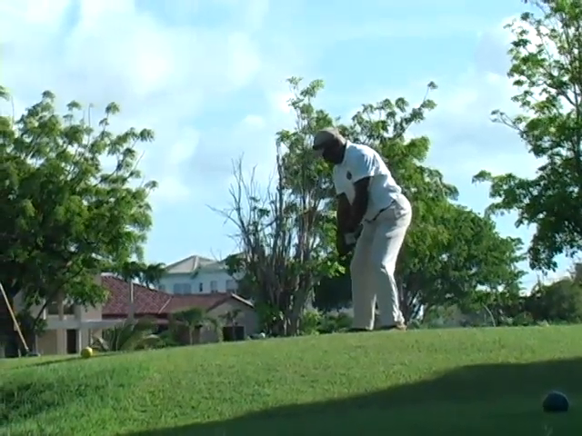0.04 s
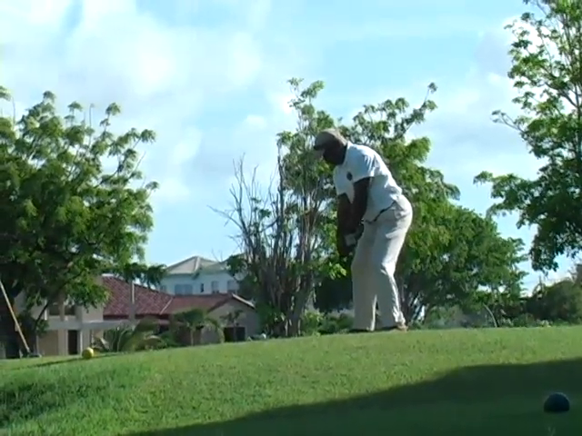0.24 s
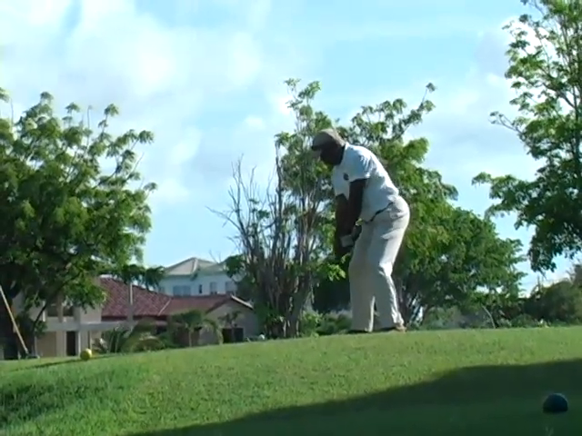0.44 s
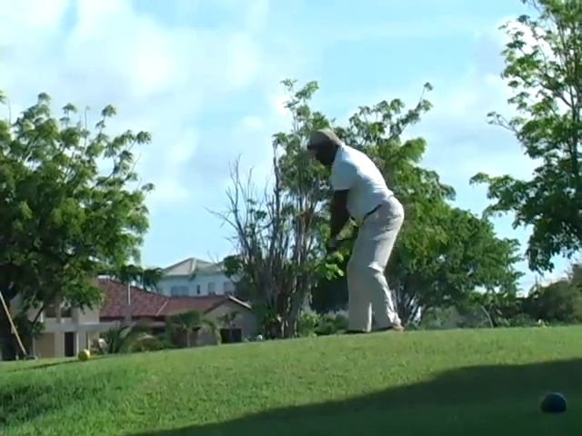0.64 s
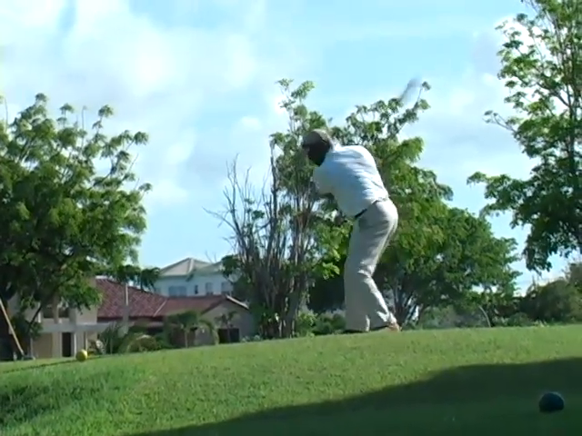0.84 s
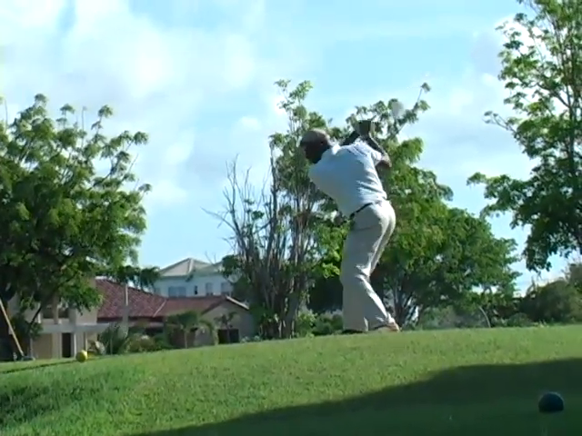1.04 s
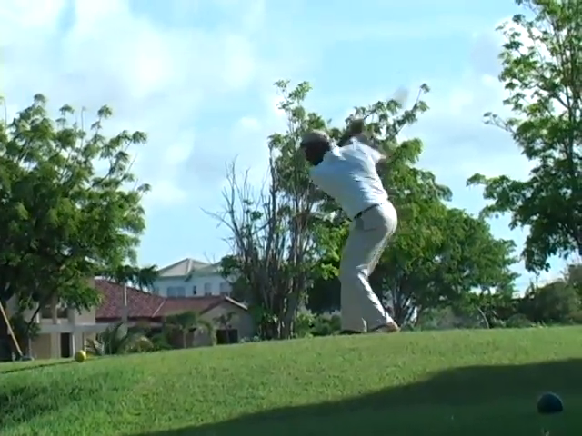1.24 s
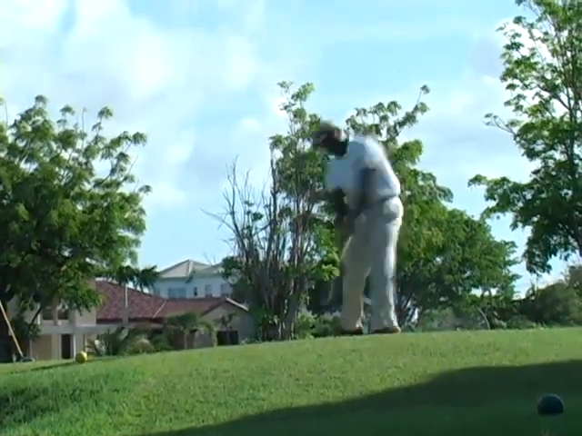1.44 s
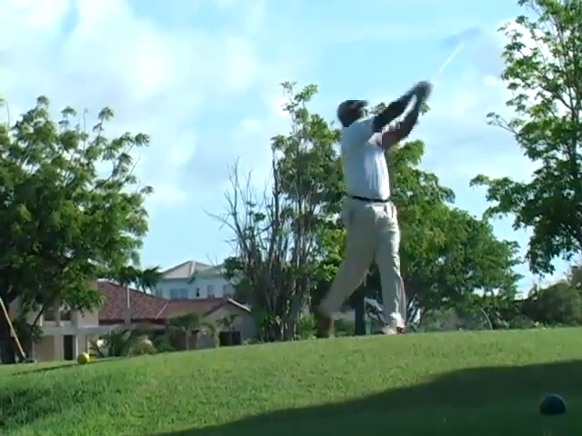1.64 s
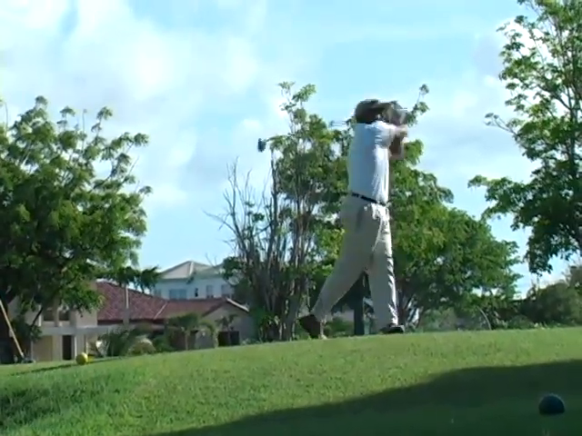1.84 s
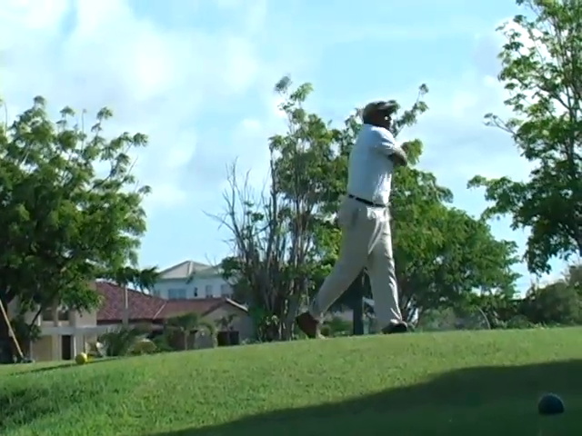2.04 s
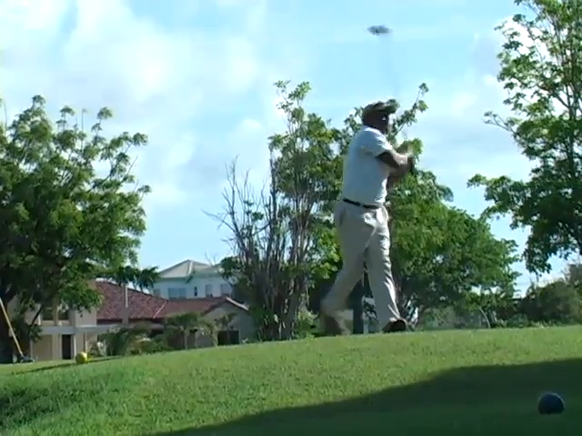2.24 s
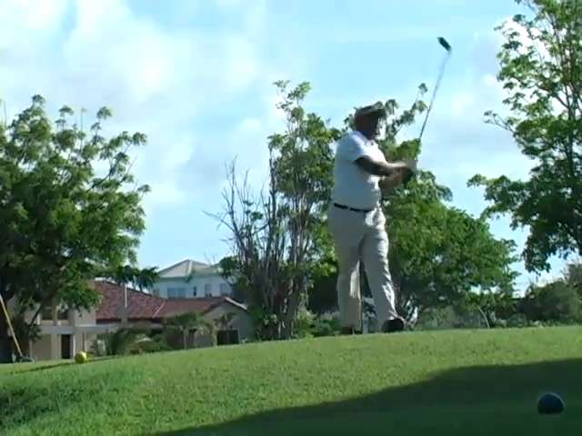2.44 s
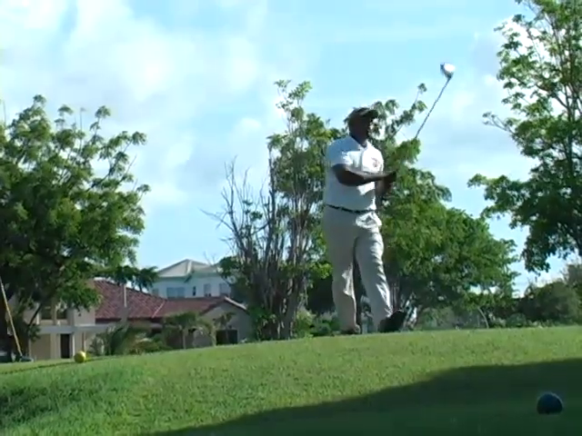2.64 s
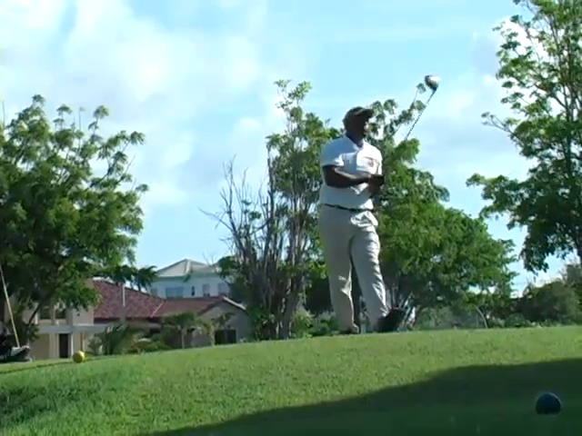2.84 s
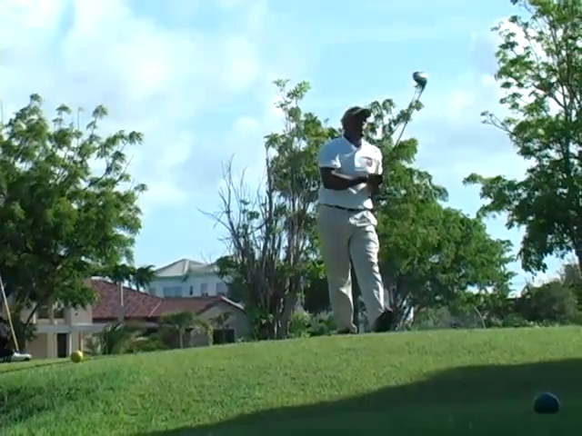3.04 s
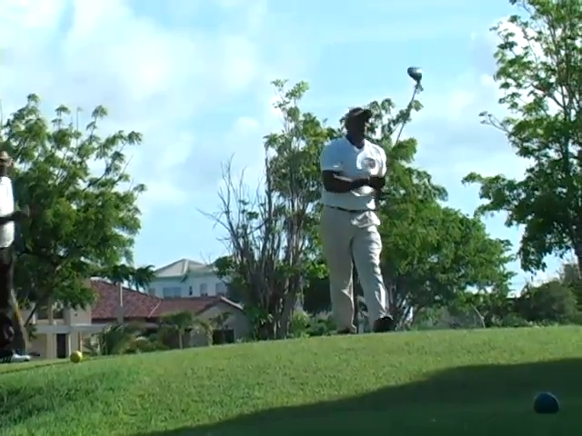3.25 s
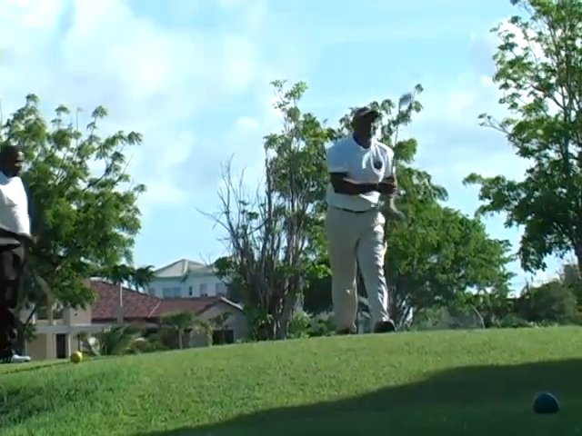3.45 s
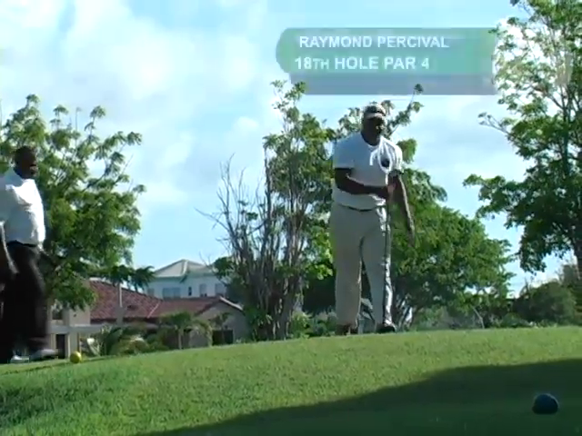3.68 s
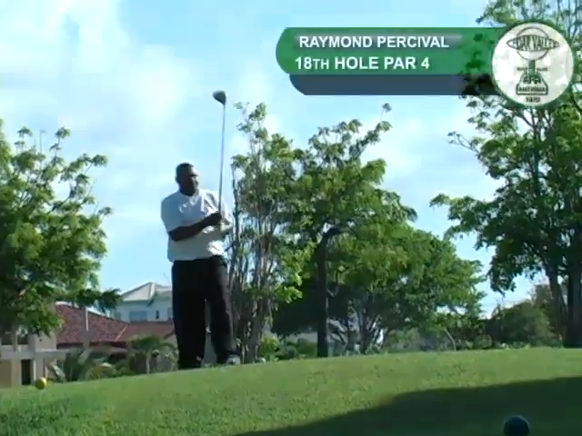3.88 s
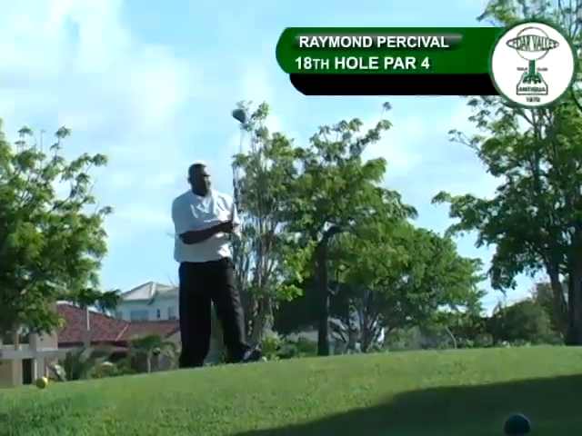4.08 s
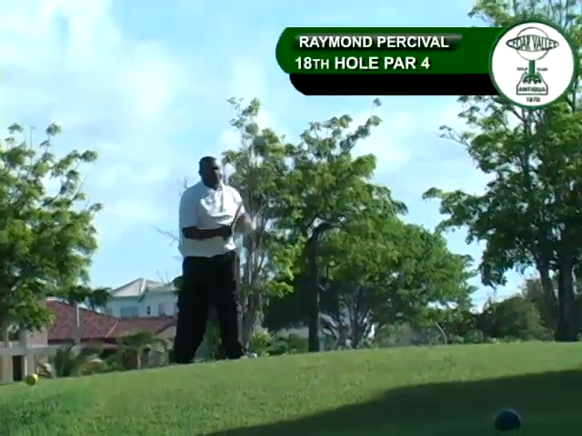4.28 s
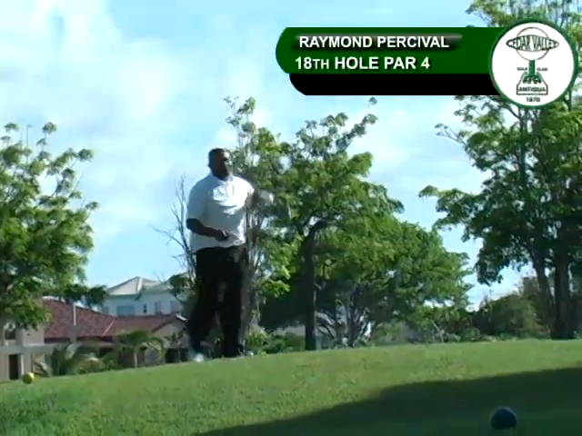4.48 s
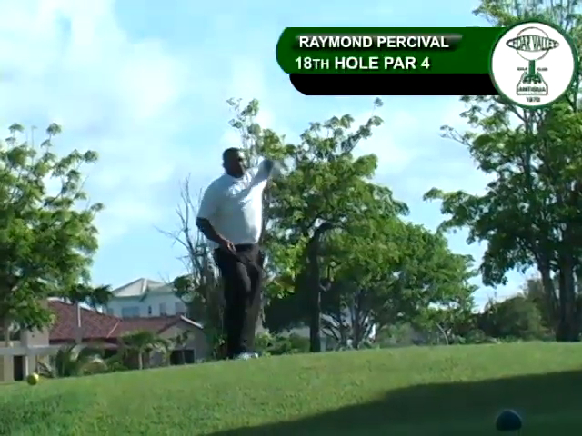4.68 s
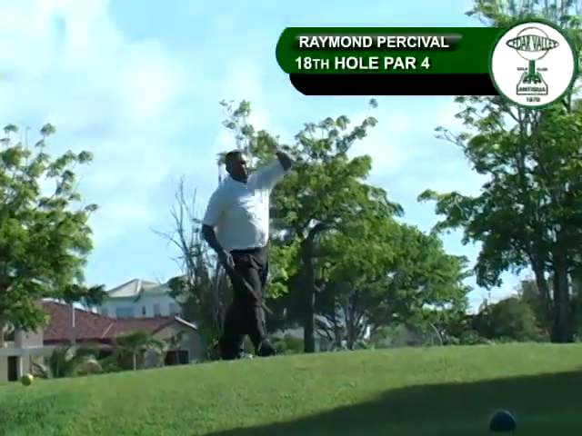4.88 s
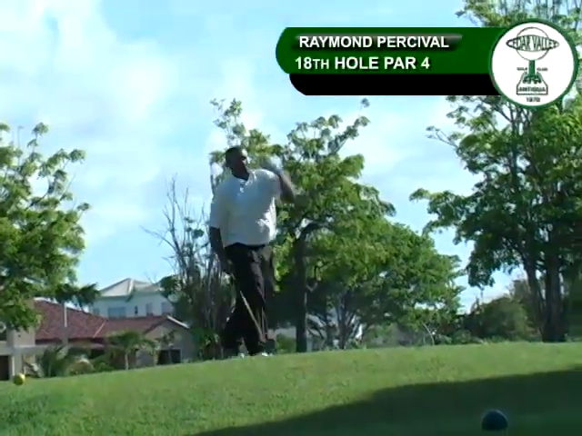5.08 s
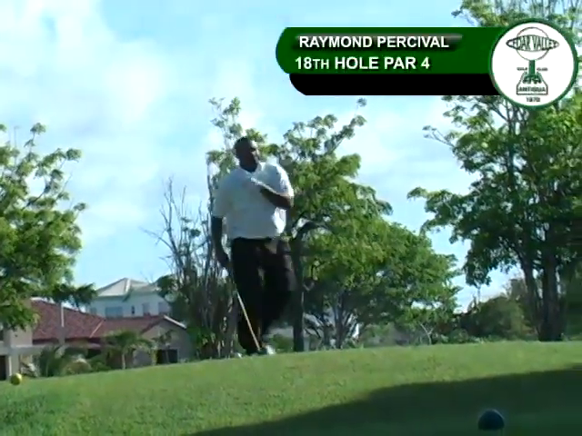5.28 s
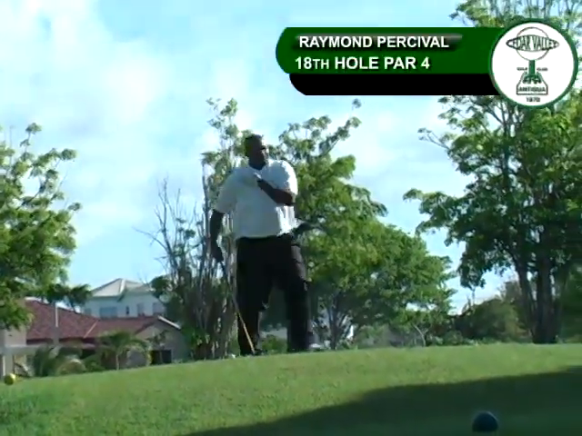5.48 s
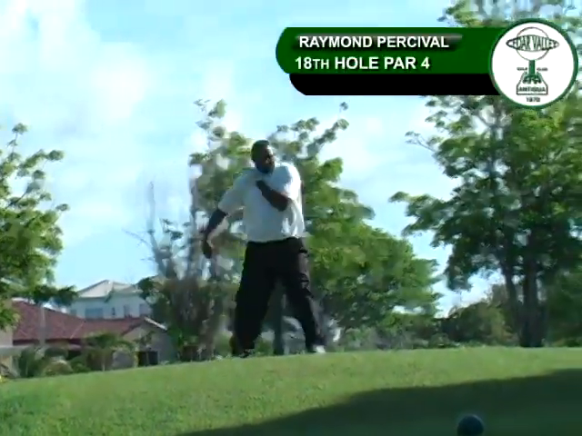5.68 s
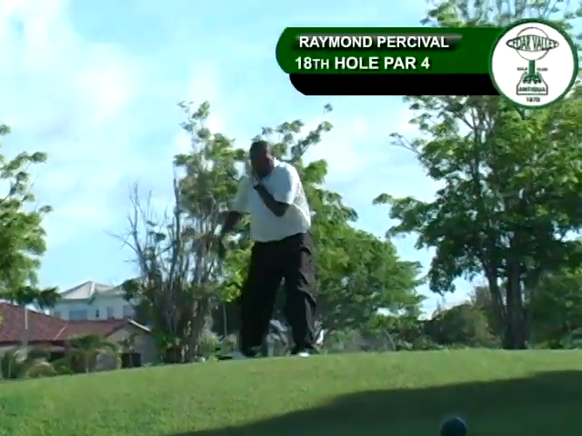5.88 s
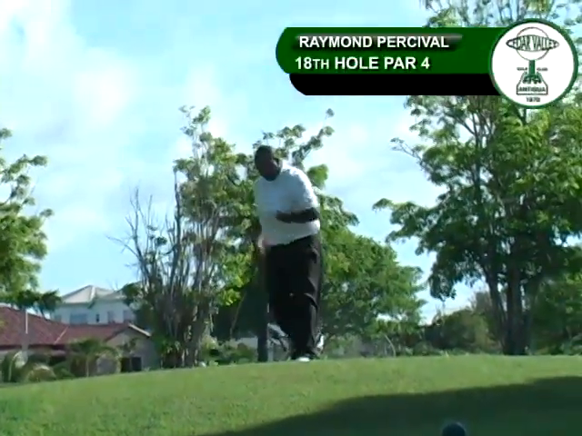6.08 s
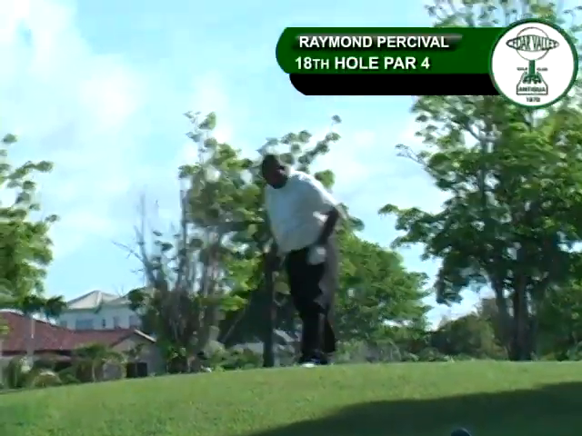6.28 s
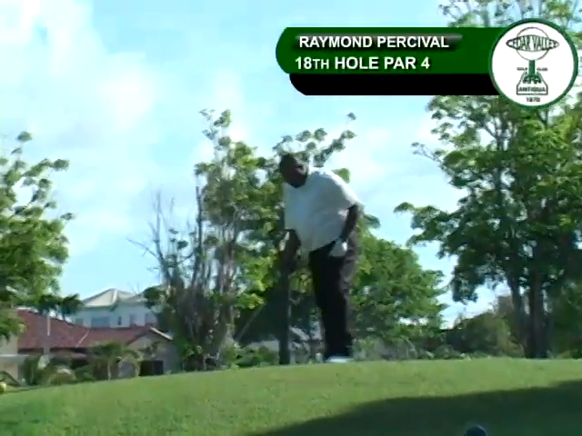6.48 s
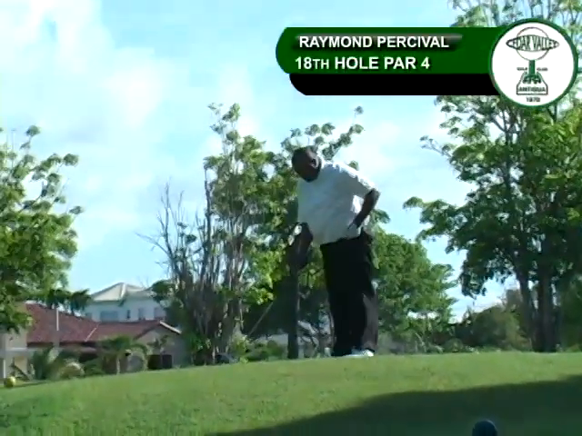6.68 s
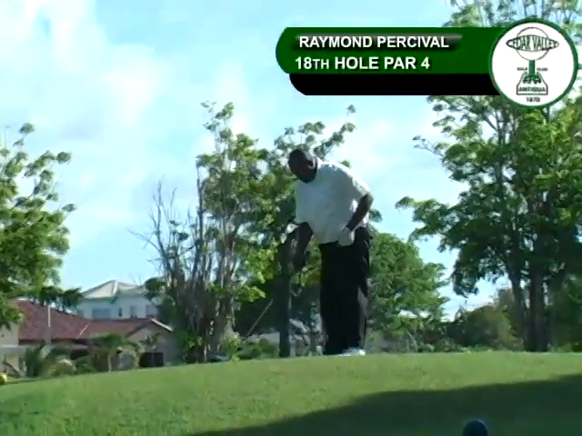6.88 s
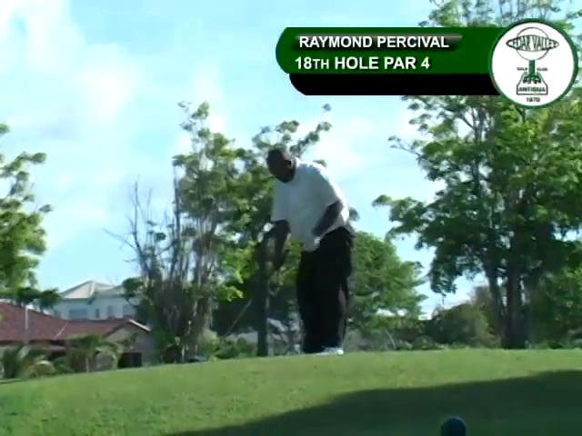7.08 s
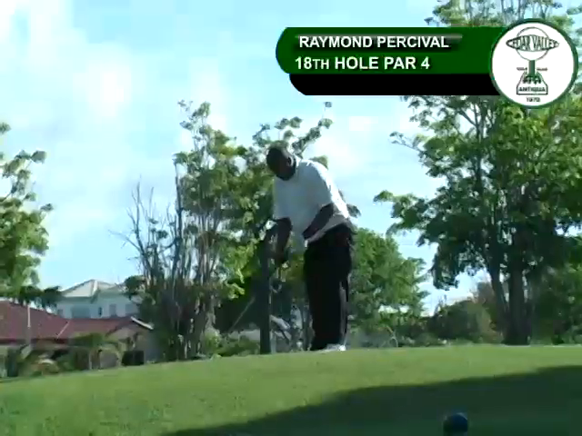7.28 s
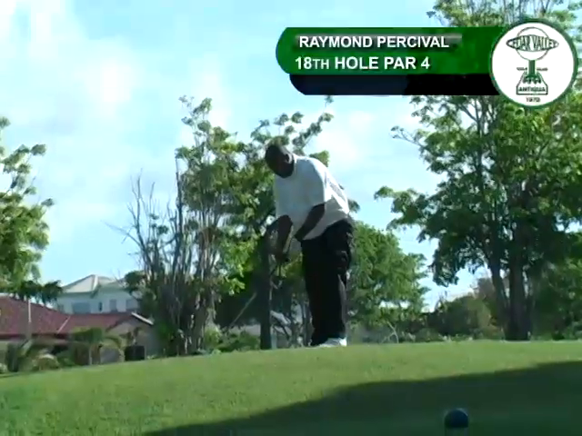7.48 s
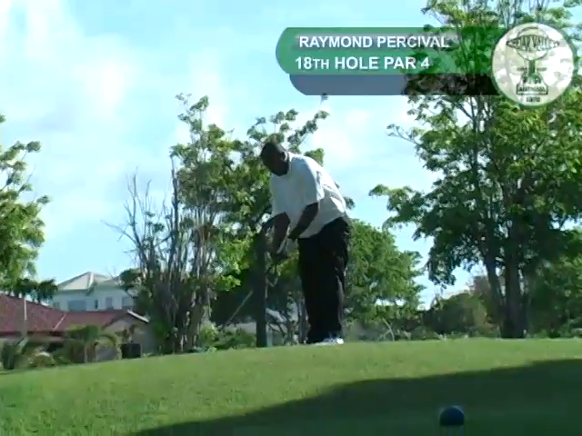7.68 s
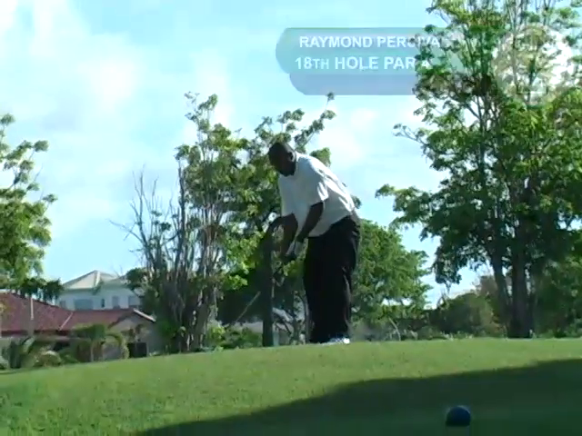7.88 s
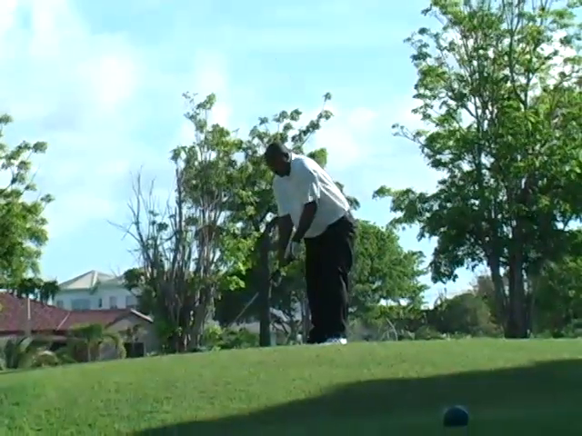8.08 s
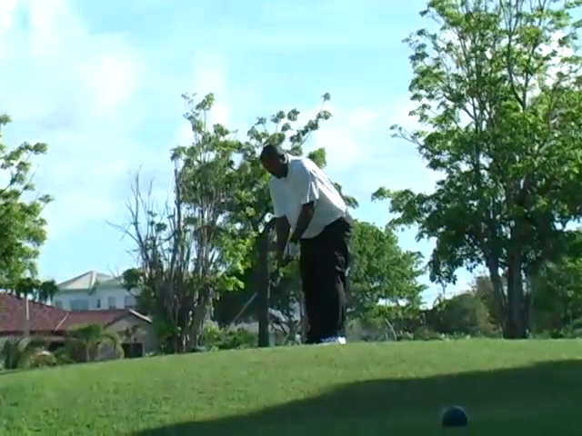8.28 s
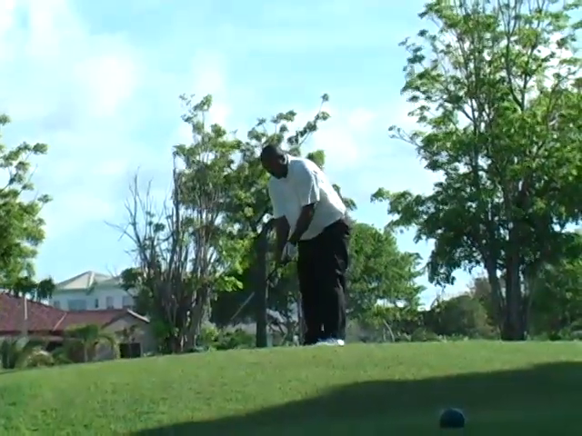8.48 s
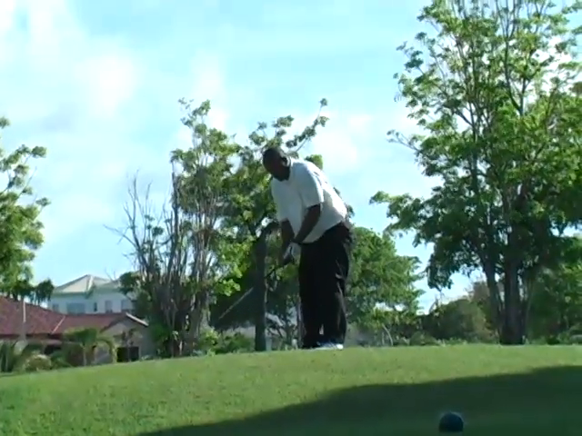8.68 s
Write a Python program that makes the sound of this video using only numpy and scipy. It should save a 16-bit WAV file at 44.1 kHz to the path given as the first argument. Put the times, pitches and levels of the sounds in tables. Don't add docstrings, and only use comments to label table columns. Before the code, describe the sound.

Outdoor golf tee with faint birds, one overloaded metal driver crack with ringing scatter, distant dog barks, buffeting wind, then bright songbird phrases.

```python
import sys
import numpy as np
from scipy import signal
from scipy.fft import rfft, irfft
from scipy.io import wavfile

SR = 44100
rng = np.random.default_rng(int(sys.argv[2]) if len(sys.argv) > 2 else 0)


def unload_audio(sound):
    columns = np.transpose(np.atleast_2d(sound))
    steps = np.round(np.clip(columns, -1, 1) * 32767)
    wavfile.write(sys.argv[1], SR, steps.astype(np.int16))


def gain_from_decibels(decibels):
    exponent = np.asarray(decibels, float) / 20
    return 10 ** exponent


N = 384993
ONE_INPUT_DB = 6.5


def rms_one(x):
    return x / np.sqrt(np.mean(x ** 2) + 1e-20)


def span(start_s, end_s):
    where = slice(round(start_s * SR), min(round(end_s * SR), N))
    return where, np.arange(N)[where] / SR


def columns(rows):
    s, *values = np.transpose(rows)
    where, t = span(s[0], s[-1])
    return where, [np.interp(t, s, v) for v in values]


def coloured(points, size):
    hz, db = np.transpose(points)
    axis_hz = np.maximum(np.fft.rfftfreq(size, 1 / SR), 1)
    gain = gain_from_decibels(np.interp(np.log(axis_hz), np.log(hz), db))
    return rms_one(irfft(rfft(rng.standard_normal(size)) * gain, size))


def sine(hz):
    return 2 * np.pi * np.cumsum(hz) / SR


def hum(hz, width_hz, size):
    lowpass = signal.butter(3, width_hz / 2, fs=SR, output="sos")
    slow = signal.sosfilt(lowpass, rng.standard_normal((2, size + 600)))[:, 600:]
    phase = sine(hz * np.ones(size))
    return rms_one(slow[0] * np.sin(phase) + slow[1] * np.cos(phase))


def drift(rate_hz, size):
    knots = rng.standard_normal(int(size / SR * 400) + 2)
    r = np.exp(-2 * np.pi * rate_hz / 400)
    smooth = rms_one(signal.lfilter([1], [1, -r], knots))
    return np.interp(np.linspace(0, len(knots) - 1, size), np.arange(len(knots)), smooth)


def add(out, start_s, x):
    i = round(start_s * SR)
    out[i:i + len(x)] += x[:N - i]


def struck(modes, spread_db=0):
    t = np.arange(SR // 10) / SR
    return sum(gain_from_decibels(db + spread_db * rng.normal() - 60 * t / t60_s) * np.sin(2 * np.pi * hz * t)
               for hz, db, t60_s in modes)


def foliage(x, wet_db, t60_s):
    t = np.arange(SR // 2) / SR
    near = gain_from_decibels(-60 * t / t60_s + 3.0 * drift(60, len(t)))
    far = gain_from_decibels(-13.5 - 60 * t / (10.0 * t60_s))
    tail = rng.standard_normal(len(t)) * (near + far) * np.clip(t / 0.0018, 0, 1)
    return x + gain_from_decibels(wet_db) * signal.fftconvolve(x, tail / np.sqrt(np.sum(tail ** 2)))[:N]


def strike():
    return impact() + head_turning() + scatter() + wall_echoes()


# hz, peak_db, t60_s
FACE_MODES = [(1070, -3, 0.0048), (1830, -13, 0.0088), (5370, -1.5, 0.018), (6710, -0.5, 0.021),
              (9400, -10, 0.018), (10330, -9, 0.018), (11400, -9, .015), (4700, -12, 0.024)]


def impact():
    strike_s, ground_echo_s, ground_echo_db = 1.5338, .0045, -11
    out, crack = np.zeros(N), struck(FACE_MODES)
    t = np.arange(len(crack)) / SR
    push = np.sin(2 * np.pi * t / 0.00061) * (t < .00052)
    spray = gain_from_decibels(-5.0 - 60 * t / 0.023) * hum(7000, 8000, len(t)) * (t > .0004)
    ground = spray + struck([(4550, 9.5, 0.0143), (10300, -9, 0.017)])
    add(out, strike_s, crack + gain_from_decibels(2.0) * push + spray)
    add(out, strike_s + ground_echo_s, gain_from_decibels(ground_echo_db) * ground)
    return out


# time_s, pitch_hz, level_db
CROWN_GLIDE = [
    (1.547, 4390, -34),
    (1.554, 4330, -25),
    (1.572, 4150, -18),
    (1.585, 4040, -25),
    (1.6, 4000, -51),
]


def head_turning():
    out = np.zeros(N)
    where, (hz, db) = columns(CROWN_GLIDE)
    out[where] = gain_from_decibels(db + 3.0 + 1.3 * drift(90, len(hz))) * np.sin(sine(hz))
    return out


# arrival_s, level_db, hold_s, t60_s
NEAR_ARRIVALS = [
    (1.536, -25.5, .04, .3),
]
FAR_ARRIVALS = [
    (1.63, -36, 0.014, 0.32),
    (1.682, -38.5, 0.0093, 0.15),
    (1.718, -39, 0.0031, .55),
]
# freq_hz, level_db (per Hz)
NEAR_SPECTRUM = [(180, -64), (300, -37), (610, -23), (808, -32), (1180, -24), (1970, -25), (3510, -22),
                 (4140, -7), (4420, -12), (4960, -14.5), (6570, -7.5), (7620, -15), (9140, -9),
                 (15500, -29)]
FAR_SPECTRUM = [(410, -34), (700, -10), (1030, -17), (3060, -14), (3710, -7), (4380, -8), (5240, -12),
                (5660, -1), (6270, -8), (10500, -14.5), (15000, -33)]
# from_hz, to_hz, width_hz, level_db
NEAR_HEAD_RING = [
    (6380, 7000, 330, -3),
    (6900, 7700, 260, -8),
    (9150, 9200, 440, -14.5),
    (5500, 3400, 330, -24),
]
FAR_HEAD_RING = [
    (3640, 4100, 120, -7),
    (5780, 7000, 330, -10),
    (6800, 7200, 430, -12),
]


def scatter():
    out = np.zeros(N)
    near = NEAR_ARRIVALS, NEAR_SPECTRUM, NEAR_HEAD_RING
    far = FAR_ARRIVALS, FAR_SPECTRUM, FAR_HEAD_RING
    for arrivals, spectrum, ring in (near, far):
        where, gain = returns(arrivals)
        size = len(gain)
        ringing = np.zeros(size)
        for from_hz, to_hz, width_hz, ring_db in ring:
            band = hum(np.linspace(from_hz, to_hz, size), width_hz, size)
            ringing += gain_from_decibels(ring_db + 2.9 * drift(45, size)) * band
        level = gain * gain_from_decibels(ONE_INPUT_DB + 1.4 * drift(110, size))
        out[where] += level * rms_one(coloured(spectrum, size) + ringing)
    return out


def returns(rows):
    rise_s = 0.0087
    where, t = span(rows[0][0], rows[-1][0] + rows[-1][2] + 0.48 * rows[-1][3])
    power = np.zeros(len(t))
    for s, db, hold_s, t60_s in rows:
        rise = np.clip((t - s) / rise_s, 0, 1)
        power += (rise * gain_from_decibels(db - 60 * np.maximum(t - s - hold_s, 0) / t60_s)) ** 2
    return where, np.sqrt(power)


# start_s, peak_db
WALL_SLAPS = [
    (1.64, -31),
    (1.681, -32),
    (1.72, -30),
    (1.755, -31),
    (2.103, -45),
]


def wall_echoes():
    out = np.zeros(N)
    t = np.arange(SR // 10) / SR
    for s, db in WALL_SLAPS:
        slap = gain_from_decibels(-11 - 60 * t / 0.052) * hum(5000, 4600, len(t))
        modes = [(3680, -8, 0.068), (4100, -2, .035), (5480, -2, .04), (5630, -1, .06)]
        add(out, s, gain_from_decibels(db) * (slap + struck(modes, spread_db=3)))
    return out


# time_s, centre_hz, level_db
SHAFT_SWISH = [
    (1.44, 498, -68),
    (1.48, 612, -50),
    (1.505, 906, -41),
    (1.515, 942, -37.5),
    (1.533, 960, -45.5),
    (1.54, 900, -70),
]


def swish():
    out = np.zeros(N)
    where, (hz, db) = columns(SHAFT_SWISH)
    whoosh = hum(hz, 450, len(hz))
    hiss = hum(3930, 6300, len(hz)) + gain_from_decibels(-7) * hum(10500, 3500, len(hz))
    out[where] = gain_from_decibels(db) * whoosh + gain_from_decibels(1.6 * (db + 44.0) - 46.5) * hiss
    return out


# long_start_s, long_length_s, crest_hz, flick_db, long_db
SONG_PAIRS = [
    (6.02, .033, 7150, -39, -29),
    (6.138, .036, 7200, -32, -27.5),
    (6.256, .065, 7160, -31, -23.5),
    (6.415, .074, 7340, -32, -23),
    (6.577, 0.08, 7620, -35, -21),
    (6.75, .092, 7750, -28, -21),
    (6.947, .093, 7550, -33, -22.5),
    (7.147, .104, 7950, -31, -23),
]


def song_notes():
    flick_lead_s, flick_s, flick_crest_hz, flick_climb_hz_per_s = .0435, 0.027, 7200, 360
    notes = []
    for s, length_s, crest_hz, flick_db, long_db in SONG_PAIRS:
        flick_hz = flick_crest_hz + flick_climb_hz_per_s * (s - SONG_PAIRS[0][0])
        notes.append((s - flick_lead_s, 0.446 * flick_s, flick_s, flick_hz, 5100, flick_db, -20))
        rise_s = .021 - .115 * length_s
        octave_db = -15 - 73 * length_s
        notes.append((s, rise_s, length_s, crest_hz, 4000, long_db, octave_db))
    return notes


# droop_s, exponent
DROOP_PLUNGE = [(.012, 4), (.018, 4.5), (.045, 8), (.062, 7), (.069, 9), (.078, 2.6), (.085, 2.4),
                (.095, 1.8)]


def songbird():
    throat_hz, branch_echo_s, branch_echo_db, wall_echo_s, wall_echo_db = 6750, 133 / SR, -8, .017, -16.5
    out, octave = np.zeros(N), np.zeros(N)
    for start_s, rise_s, length_s, crest_hz, end_hz, db, top_db in song_notes():
        where, t = span(start_s, start_s + length_s)
        crest_s, droop_s = start_s + rise_s, length_s - rise_s
        rise = np.clip((crest_s - t) / rise_s, 0, 1)
        fall = np.clip((t - crest_s) / droop_s, 0, 1)
        plunge = np.interp(droop_s, *np.transpose(DROOP_PLUNGE))
        sink = .42 * fall ** 1.25 + .58 * fall ** plunge
        hz = crest_hz * (1 - .33 * rise ** 3) - (crest_hz - end_hz) * sink
        hz = hz * (1 + 0.0057 * drift(35, len(t)))
        throat_db = np.maximum(-12 * np.log10(1 + ((hz - throat_hz) / 450) ** 2), -11.5)
        throat_db = throat_db - 1 * fall ** 3.6
        octave_db = np.maximum(top_db - 20 * np.log10(1 + ((hz - throat_hz) / 650) ** 2), -38)
        effort_db = db + 2.5 - 6.0 * rise ** 1.2 + 2.0 * drift(150, len(t))
        level = gain_from_decibels(effort_db) * signal.windows.tukey(len(t), .3)
        out[where] += level * gain_from_decibels(throat_db) * np.sin(sine(hz))
        octave[where] += level * gain_from_decibels(octave_db) * np.sin(2 * sine(hz))
    add(out, branch_echo_s, -gain_from_decibels(branch_echo_db) * out)
    add(out, wall_echo_s, gain_from_decibels(wall_echo_db) * out)
    return foliage(out + 0.6 * octave, wet_db=-8.0, t60_s=0.12) + 0.66 * octave


def far_birds():
    out = np.zeros(N)
    for start_s, call in stepping_bird() + far_songbird() + stray_calls() + trill() + hoarse_calls():
        add(out, start_s, call)
    return foliage(out, wet_db=-3.0, t60_s=0.099)


STEP_STARTS = [2.262, 2.358, 2.458, 2.561, 2.671, 2.785, 2.893, 3.005]


def stepping_bird():
    length_s, top_hz, sag_hz_per_s, end_hz, first_db, swell_db_per_s = .042, 6200, 800, 4150, -60.5, 8
    calls = []
    for s in STEP_STARTS:
        since_s = s - STEP_STARTS[0]
        db = first_db + swell_db_per_s * since_s
        from_hz = top_hz - sag_hz_per_s * since_s
        calls.append(whistle(s, length_s, from_hz, end_hz, db, bend=.72, flutter_db=4.5))
        calls.append(whistle(s + length_s, .02, 4300, 3760, db - 0.5))
    return calls


# start_s, length_s, end_hz, level_db
CREST_FALLS = [(2.734, 0.063, 5150, -54.5), (2.908, .04, 5600, -57), (3.094, .039, 5600, -55),
               (8.145, .03, 6300, -54), (8.324, .04, 6020, -55), (8.497, 0.053, 6100, -53),
               (8.69, 0.044, 6000, -52)]
# start_s, from_hz, level_db
UP_FLICKS = [(2.784, 5300, -50), (2.955, 5160, -52), (8.028, 5900, -50), (8.068, 5600, -47.5),
             (8.205, 6400, -52), (8.565, 6040, -49)]


def far_songbird():
    calls = [whistle(s, length_s, 7700, hz, db, bend=1.2) for s, length_s, hz, db in CREST_FALLS]
    return calls + [whistle(s, 0.0168, hz, hz + 1200, db) for s, hz, db in UP_FLICKS]


# start_s, length_s, from_hz, to_hz, level_db
STRAY_WHISTLES = [(1.062, .018, 5450, 5500, -60.5), (1.103, 0.027, 5700, 5650, -62),
                  (1.199, 0.128, 4250, 4270, -69.5), (1.37, .04, 3850, 4300, -59),
                  (1.405, 0.071, 4300, 4280, -63), (1.61, .032, 4430, 4680, -46),
                  (2.054, .04, 7200, 6200, -61), (2.08, 0.036, 3700, 3660, -61),
                  (2.539, 0.054, 3610, 3540, -62), (2.957, 0.09, 3290, 4700, -62),
                  (3.03, 0.027, 5050, 4950, -54), (3.1, 0.041, 4110, 3900, -57),
                  (3.142, 0.027, 3900, 3320, -60), (3.455, 0.056, 4750, 5100, -64),
                  (3.538, 0.085, 3930, 3950, -63), (3.543, 0.032, 4350, 5050, -60),
                  (3.81, .05, 4750, 4820, -68), (4.044, 0.012, 7600, 8300, -39.5),
                  (4.046, .015, 11000, 10300, -47), (7.444, 0.017, 5250, 7700, -45.5),
                  (7.462, .03, 7700, 6800, -51), (7.62, .055, 7900, 7830, -42),
                  (7.735, .018, 10500, 10100, -58), (7.624, 0.032, 6100, 6800, -40),
                  (7.653, 0.02, 6800, 6200, -40.5), (7.734, .052, 6800, 6000, -48.5),
                  (7.78, .02, 5600, 5280, -52.5), (7.797, 0.011, 4560, 3700, -54),
                  (7.95, 0.028, 6900, 6800, -54), (8.085, 0.018, 7100, 5400, -54),
                  (8.398, 0.028, 6000, 4900, -56), (8.544, .025, 5500, 3900, -55),
                  (8.615, 0.066, 5940, 4215, -56.5)]
LONG_WHEEZE = (7.125, .305, 4980, 4250, -50)


def stray_calls():
    calls = [whistle(*row) for row in STRAY_WHISTLES]
    return calls + [whistle(*LONG_WHEEZE, octave_db=-6, flutter_db=2.5)]


# start_s, pitch_hz, level_db
TRILL_PIPS = [(3.385, 4550, -68), (3.455, 4200, -64), (3.598, 4500, -64), (3.635, 4300, -62),
              (3.672, 4350, -64), (3.71, 4500, -62), (3.72, 4010, -64), (3.76, 4550, -67),
              (8.173, 4570, -55), (8.242, 4530, -50.5), (8.288, 4045, -57), (8.322, 4270, -52.5),
              (8.359, 4300, -55), (8.392, 4660, -48), (8.438, 4560, -49)]


def trill():
    pip_s, climb_hz = 0.0238, 348
    calls = [whistle(s, pip_s, hz - climb_hz, hz, db, bend=0.47) for s, hz, db in TRILL_PIPS]
    return calls + [buzz(s, pip_s + 0.0121, hz, 720, 55.3, db - 0.5) for s, hz, db in TRILL_PIPS]


# start_s, length_s, centre_hz, level_db
HOARSE_RASPS = [(3.923, 0.08, 8210, -36.5), (3.933, 0.057, 6600, -42.5), (7.319, 0.099, 8760, -44),
                (7.461, 0.023, 7500, -45.5), (7.489, 0.027, 6650, -33), (7.513, 0.12, 6470, -41.5),
                (7.615, 0.071, 7760, -44), (7.699, .069, 7300, -46.5), (7.73, .023, 7300, -51),
                (8.052, 0.03, 8230, -50), (8.708, 0.028, 8520, -51)]
# start_s, length_s, centre_hz, width_hz,
# level_db
WING_RUSTLES = [(0.0, 0.074, 8500, 3000, -57), (.3, .1, 8820, 2500, -60), (0.991, 0.045, 9700, 2000, -53),
                (1.016, 0.06, 8300, 1800, -54), (2.313, .03, 7700, 3000, -53),
                (2.331, 0.057, 8090, 3150, -43), (2.368, 0.052, 7700, 1800, -50),
                (3.905, 0.026, 7000, 9000, -46.5), (3.899, 0.11, 9880, 8500, -47.5),
                (3.904, 0.13, 6380, 2500, -53), (4.85, 0.07, 8500, 2500, -54),
                (6.296, 1, 6750, 3050, -49.5), (7.098, .319, 6580, 3300, -44),
                (7.2, 0.5, 11840, 6000, -58.5), (7.471, 0.22, 7230, 3680, -44.5),
                (7.642, 0.034, 3200, 2570, -45), (7.808, .1, 7070, 3500, -52.5)]
# start_s, length_s, centre_hz, throbs_per_s, level_db
FAR_TWITTER = [
    (2.8, 0.45, 6800, 8.1, -61),
    (3.391, 0.2, 4570, 12.7, -67),
    (3.6, 0.23, 4360, 21, -70),
    (8.099, .63, 6580, 9.2, -57.5),
    (8.465, 0.086, 4400, 22, -56),
]


def hoarse_calls():
    calls = [buzz(s, length_s, hz, 590, 55.3, db) for s, length_s, hz, db in HOARSE_RASPS]
    calls += [buzz(s, length_s, hz, width_hz, 56, db) for s, length_s, hz, width_hz, db in WING_RUSTLES]
    return calls + [buzz(s, length_s, hz, 0.31 * hz, per_s, db) for s, length_s, hz, per_s, db in FAR_TWITTER]


def whistle(start_s, length_s, from_hz, to_hz, db, bend=.8, octave_db=-30, flutter_db=2.5):
    where, t = span(start_s, start_s + length_s)
    glide_hz = from_hz + (to_hz - from_hz) * np.abs((t - start_s) / length_s) ** bend
    phase = sine(glide_hz * (1 + 0.0058 * drift(69, len(t))))
    level = gain_from_decibels(db + 3.5 + flutter_db * drift(80, len(t))) * signal.windows.tukey(len(t), .25)
    return start_s, level * (np.sin(phase) + gain_from_decibels(octave_db) * np.sin(2 * phase))


def buzz(start_s, length_s, hz, width_hz, throbs_per_s, db):
    where, t = span(start_s, start_s + length_s)
    throb = gain_from_decibels(2.9 * np.cos(2 * np.pi * throbs_per_s * (t - start_s)) + 1.4 * drift(40, len(t)))
    edges = np.clip(np.minimum((t - start_s) / 0.0023, (start_s + length_s - t) / 0.019), 0, 1)
    band = hum(hz * (1 + 0.0149 * drift(15.1, len(t))), width_hz, len(t))
    return start_s, gain_from_decibels(db) * edges * throb * band


# start_s, length_s, pitch_hz, level_db, octave_db
DOG_BARKS = [
    (1.274, 0.064, 539, -46.5, -15),
    (3.42, 0.085, 504, -46, -11.5),
    (6.73, 0.055, 493, -49.5, -5),
    (6.99, 0.051, 498, -51, -4.5),
    (8.33, 0.07, 453, -56, 0.5),
]


def dog():
    out = np.zeros(N)
    for s, length_s, hz, db, octave_db in DOG_BARKS:
        where, t = span(s, s + length_s)
        phase = sine(hz * (1.08 - 0.162 * (t - s) / length_s + 0.0088 * drift(40, len(t))))
        voice = np.sin(phase) + gain_from_decibels(octave_db) * np.sin(2 * phase)
        breath = gain_from_decibels(octave_db + 1.5) * hum(850, 610, len(t))
        out[where] += gain_from_decibels(db + 2.5) * np.hanning(len(t)) ** 0.27 * (voice + breath)
    return foliage(out, wet_db=1, t60_s=0.085)


# start_s, pitch_hz, peak_db, t60_s
BODY_KNOCKS = [(3.907, 382, -33, 0.071), (3.916, 203, -37, .15), (3.927, 52, -36, .25),
               (3.971, 105, -34, .08), (4.053, 60, -37, .08), (4.148, 75, -38, .06), (4.268, 50, -34, .1),
               (5.29, 40, -37, .12), (5.37, 35, -39, .2), (5.535, 35, -33, .15), (5.57, 70, -33, .1),
               (4.888, 111.6, -41, 0.36), (5.5, 112, -35.5, 0.15), (6.213, 262, -28, 0.044),
               (6.707, 690, -36, 0.048)]


def knocks():
    out = np.zeros(N)
    for s, hz, db, t60_s in BODY_KNOCKS:
        add(out, s, struck([(hz, db, t60_s)]))
    return out


def wind():
    spectrum = [(12, -26), (28, -2.5), (42, 0.5), (70, -14.5), (110, -5.5), (150, -16.5),
                (300, -24.0), (800, -31.0), (2500, -95)]
    lumps = coloured(spectrum, N) * gain_from_decibels(4.1 * drift(8.6, N))
    return gain_from_decibels(wind_db() + ONE_INPUT_DB - 1.0) * rms_one(lumps)


# time_s, level_db
STEADY_WIND = [(0.0, -60), (1.2, -65.5), (2.6, -61.5), (3.902, -61.5), (3.912, -43), (4.0, -46.5),
               (4.45, -56), (5.05, -58), (5.5, -51), (5.9, -51), (6.05, -60), (6.5, -50), (7.0, -59.5),
               (7.5, -70), (8.2, -59), (8.73, -64)]
# peak_s, level_db
WIND_GUSTS = [(.41, -55.5), (.8, -57), (1.31, -56), (1.51, -55), (4.16, -47), (4.28, -47), (4.53, -50),
              (4.69, -51), (4.91, -46.5), (5.6, -52), (6.2, -45.5), (6.42, -46.5), (7.58, -57),
              (8.24, -49.5)]


def wind_db():
    rise_db_per_s, fall_db_per_s = 160.5, 92
    t = np.arange(N) / SR
    levels_db = [np.interp(t, *np.transpose(STEADY_WIND))]
    for s, db in WIND_GUSTS:
        levels_db.append(db - np.maximum(rise_db_per_s * (s - t), fall_db_per_s * (t - s)))
    return np.max(levels_db, axis=0)


# freq_hz, level_db (per Hz)
AIR_SPECTRUM = [(12, -29), (20, 5.5), (40, -11.5), (74, -6.5), (219, 0.5), (383, -1), (687, -4.5),
                (2090, -16.5), (9140, -16.5), (13900, -23), (15500, -25)]


def air():
    out = gain_from_decibels(-53 + ONE_INPUT_DB - 1.0 + 0.51 * drift(2.5, N)) * coloured(AIR_SPECTRUM, N)
    out[round(3.906 * SR):] *= gain_from_decibels(1.43)
    return out


def scene():
    live = strike() + swish() + songbird() + far_birds() + dog() + knocks() + wind() + air()
    return np.array([live, np.zeros(N)])


def band_limit(x):
    return signal.sosfilt(signal.butter(12, 15670, fs=SR, output="sos"), x)


def record(dry):
    idle_hiss_db, crosstalk_db, crosstalk_hz = -82, -34, 300
    live = np.clip(dry[0], -1, 1)
    supply = signal.butter(2, [11, crosstalk_hz], "band", fs=SR, output="sos")
    sag = signal.sosfilt(supply, np.minimum(.12 - np.abs(live), 0))
    hiss = coloured([(20, 9), (150, -35), (600, 10.0), (15000, 3.0), (20000, 5.0)], N)
    idle = gain_from_decibels(idle_hiss_db) * hiss + gain_from_decibels(crosstalk_db) * sag
    return band_limit(np.array([live, idle]))


dry = scene()
out = record(dry)
unload_audio(out)
```